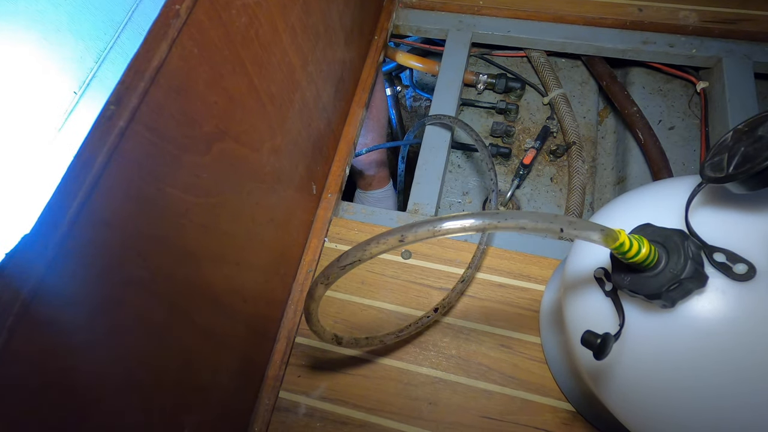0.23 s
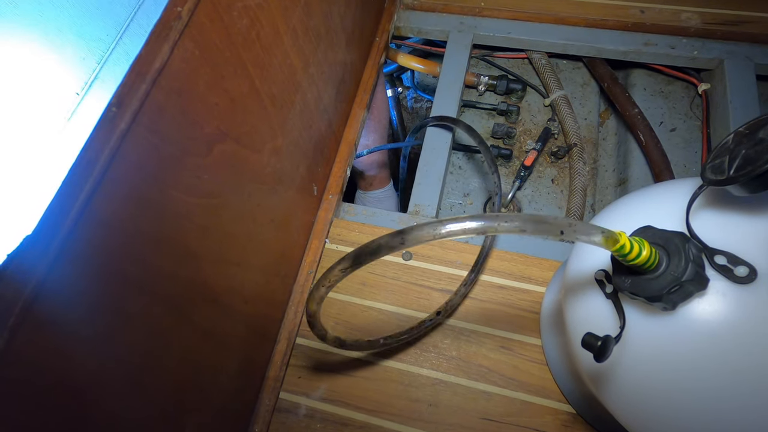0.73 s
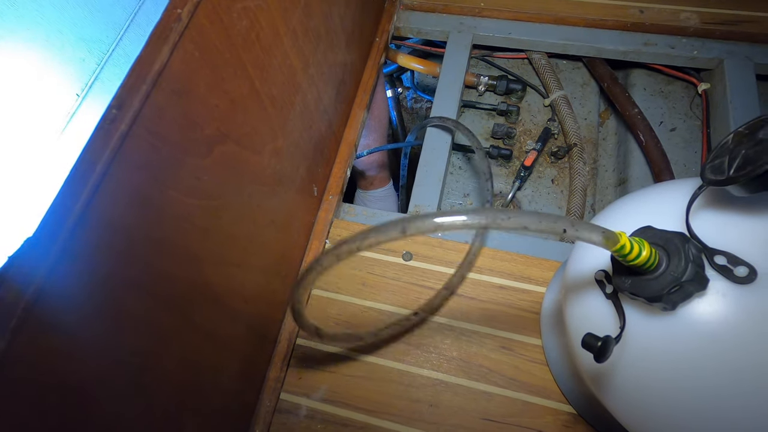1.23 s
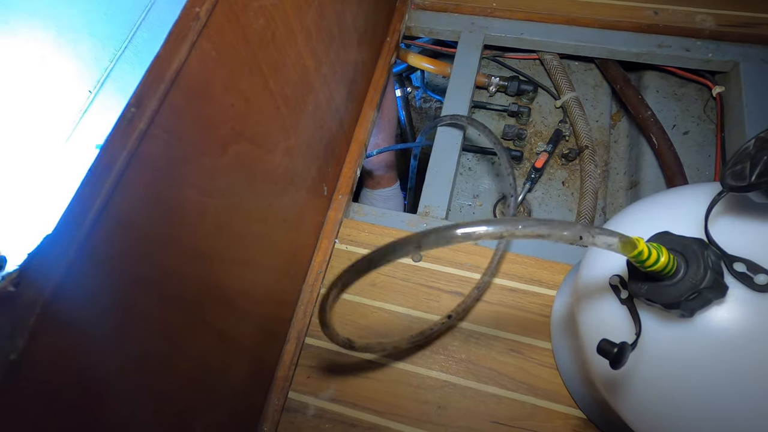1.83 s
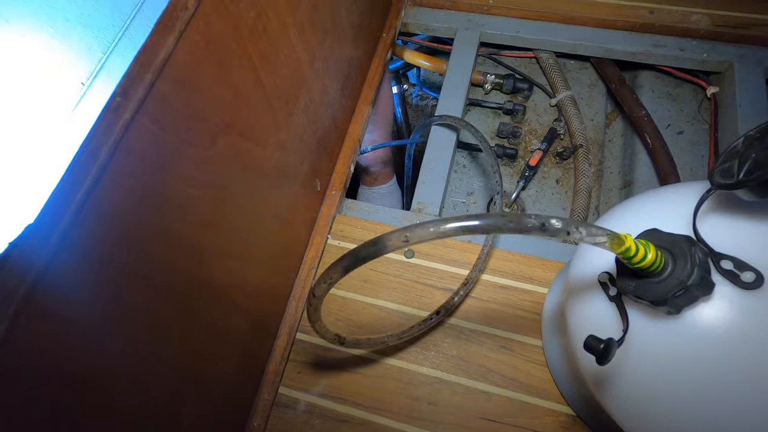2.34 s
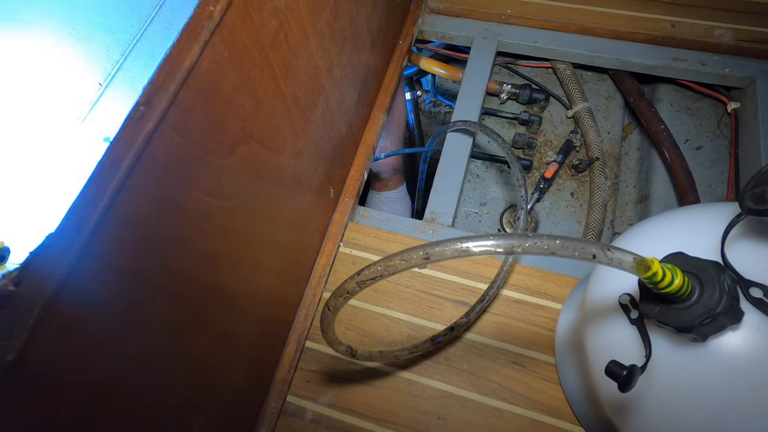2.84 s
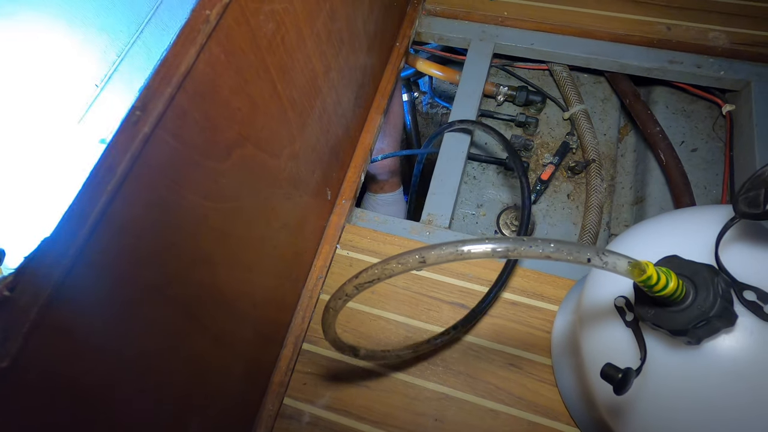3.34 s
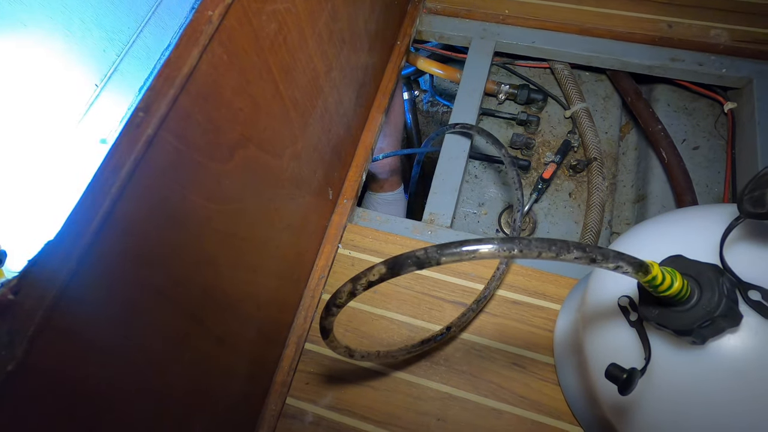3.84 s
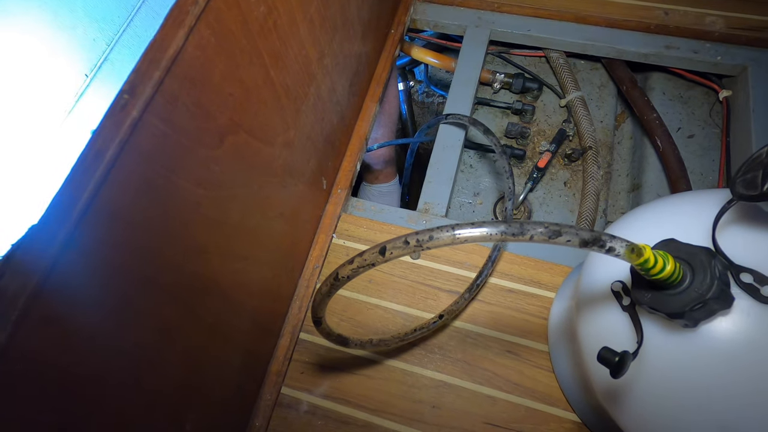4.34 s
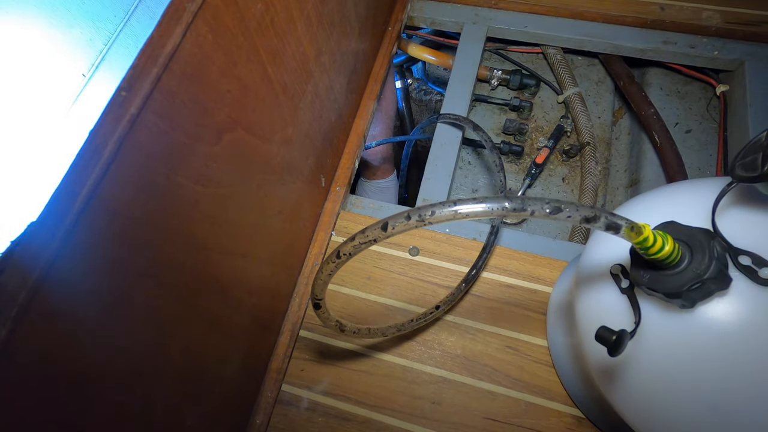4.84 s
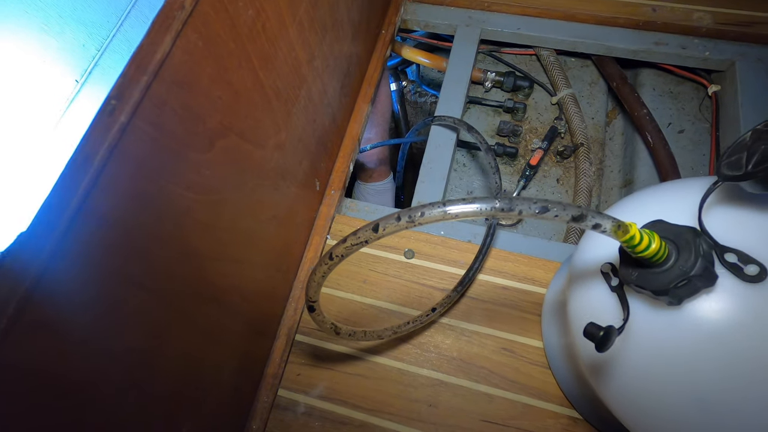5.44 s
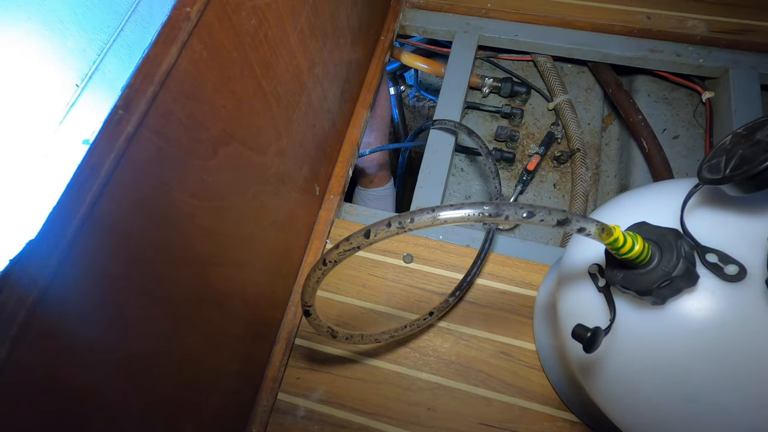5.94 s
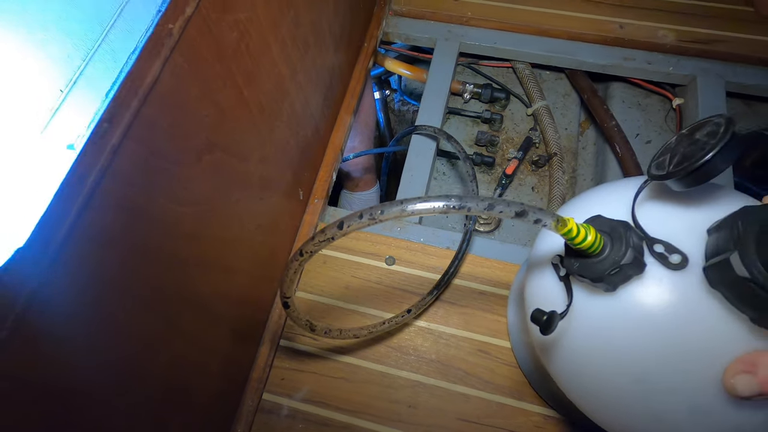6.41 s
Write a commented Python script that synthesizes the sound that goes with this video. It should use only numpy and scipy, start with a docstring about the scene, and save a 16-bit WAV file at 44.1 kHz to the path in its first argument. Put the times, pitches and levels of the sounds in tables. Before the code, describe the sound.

A close microphone in a small wooden boat bilge, with short boxy reflections and a faint low cabin hush. From 0 to 2.2 s a hose slurps air and oily liquid in dense, uneven gulps: hissy, spitting air with fizz, wet gurgles, bubbles sliding in pitch, tiny whistles and low hose shudders. From 2.2 to 3.3 s only a thin, hissing draught remains, with a sharp squeaky whistle at 2.6 s. Sputtering gulps return from 3.3 to 4.3 s, with hard knocks near 3.75 and 3.86 s and a soft floor slap. Suction dies by 4.6 s. Light rubs, creaks and dry ticks follow; a hollow plastic thump lands at 5.05 s. Pump strokes hiss at 5.2, 5.8 and 6.4 s, each about 0.15 s, stopped abruptly by a dull canister knock at 5.34, 5.97 and 6.55 s. Handling clunks fall between them, notably at 5.65 and 6.27 s.

```python
"""Gulps of air and oily water slurp up a hose from a boat's bilge, with fizz, gurgles and a few whistles;
the hose shudders and slaps the floor. Then a hand works the vacuum pump: in three strokes the piston
hisses down and knocks the plastic canister. Noise is coloured and sent through the hose's resonances for
the slurp, and through a seal's colour for the hiss; blows ring the canister as a set of fading tones."""
import sys
import numpy as np
from scipy import signal
from scipy.fft import rfft, irfft, next_fast_len
from scipy.io import wavfile
from scipy.ndimage import uniform_filter1d

SR = 44100
rng = np.random.default_rng(int(sys.argv[2]) if len(sys.argv) > 2 else 0)


def generate_wav(signal):
    """Clip the signal to [-1, 1] and save it as 16-bit WAV at the path in sys.argv[1]."""
    frames = np.transpose(np.atleast_2d(signal))
    scaled = np.clip(frames, -1, 1) * 32767
    pcm = np.round(scaled).astype(np.int16)
    wavfile.write(sys.argv[1], SR, pcm)


N = 294147  # samples
T = np.arange(N) / SR


def amp(db):
    """Turns dB into a factor on the sound wave."""
    return 10 ** (np.asarray(db) / 20)


def evened(x):
    """Scales x to an average (RMS) strength of 1."""
    return x / np.sqrt(np.mean(x ** 2) + 1e-20)


def read(points, hz):
    """Reads a curve between its points, along a log pitch scale."""
    f, value = np.transpose(points)
    return np.interp(np.log(hz + 1), np.log(f + 1), value)


def add(mix, s, sound):
    """Adds a sound into the mix from second s, cut off at the end of the mix."""
    part = mix[round(s * SR):][:len(sound)]
    part += sound[:len(part)]


def coloured(x, spectrum):
    """Filters x by a spectrum and evens it, so only the shape of the spectrum counts."""
    size = next_fast_len(len(x))
    gain = amp(read(spectrum, np.fft.rfftfreq(size, 1 / SR)))
    return evened(irfft(rfft(x, size) * gain, size)[:len(x)])


def resonate(x, hz, width):
    """A resonance of gain 1: shifts hz down to zero, smooths, and shifts back."""
    turn = np.exp(2j * np.pi * np.cumsum(hz * np.ones(len(x))) / SR)
    r = np.exp(-np.pi * width / SR)
    smooth = signal.lfilter([1 - r], [1, -r], x / turn + 1e-18)
    return 2 * (turn * smooth).real


def sputter(flicker_db, patchy_db):
    """White noise that flickers as droplets tear and drifts in patches of colour."""
    _, _, z = signal.stft(rng.standard_normal(N), nperseg=256, noverlap=192)
    patches = uniform_filter1d(rng.standard_normal(z.shape), size=5, axis=0)
    patches = uniform_filter1d(patches, size=20, axis=1)
    flicker = uniform_filter1d(rng.standard_normal(z.shape[1]), size=3)
    z = z * amp(patchy_db * evened(patches) + flicker_db * evened(flicker))
    return evened(signal.istft(z, nperseg=256, noverlap=192)[1][:N])


def curves(table):
    """Every column of a table after the time, drawn out to one value a sample."""
    s, *rest = np.transpose(table)
    return np.array([np.interp(T, s, c) for c in rest])


def burst(start, rise, hold, drift_db, fall_db_per_s):
    """Power of one burst: a smooth rise, a drifting hold, a steady fall in dB."""
    t = T[round(start * SR):][:SR // 2] - start
    held = np.clip((t - rise) / max(hold, .001), 0, 1)
    db = drift_db * held - fall_db_per_s * np.maximum(t - rise - hold, 0)
    swell = np.sin(np.pi / 2 * np.clip(t / max(rise, .001), 0, 1)) ** 2
    return (swell * amp(db)) ** 2


# resonances of the air column in the hose: [f/Hz, width/Hz, level/dB]
HOSE_MODES = [(1617, 55, -11), (2033, 38, -6), (2266, 78, 1), (2750, 14, -24.5), (3360, 36, -4),
              (3830, 95, -11), (4320, 99, -12), (4572, 22, -2), (6023, 28, -1), (6420, 320, -15.5),
              (7760, 16, -10), (8600, 33, -8), (9200, 370, 0.5), (9140, 44, -2.5), (9540, 28, 9),
              (9300, 38, -25), (10300, 40, -11), (10700, 66, -10.5)]
# colour of the air rush, of the hiss above it and of the spray fizz: [f/Hz, level/dB], shape only
RUSH_COLOUR = [(500, -36.5), (800, -2.5), (1300, -0.5), (1700, 1.5), (2300, 1.5), (2800, 3), (3400, -55.5)]
UPPER_COLOUR = [(2400, -16), (2950, 0), (3800, 3), (4700, -0.5), (5200, -5.5), (6000, -43.5)]
FIZZ_COLOUR = [(2940, -23), (5000, 1.5), (5600, 4.5), (6870, 4), (8300, 0), (8960, -4), (9440, -2),
               (10900, 0.5), (13600, -14), (15500, -44)]


def slurp():
    """Air tears through the hose modes, spray fizzes, bubbles gurgle and the hose shudders on the floor."""
    rush, hiss, spray, gurgle, shake = flow()
    air = coloured(sputter(1.4, 2.2), RUSH_COLOUR)
    upper = coloured(sputter(1.4, 2.2), UPPER_COLOUR)
    fizz = coloured(sputter(1.4, 2.2), FIZZ_COLOUR)
    jet = rush * air + hiss * upper + spray * fizz
    piped = 0.64 * jet + sum(amp(db) * resonate(jet, f, w) for f, w, db in HOSE_MODES)
    wash = coloured(sputter(2.2, 1.9), [(120, -39), (230, 18), (800, 16.5), (1100, -22.5)])
    shudder = coloured(rng.standard_normal(N),
                       [(30, -32.0), (70, 4.5), (100, 4), (140, 10.5), (200, 8.5), (260, -49.0)])
    wet = gurgle * (wash + amp(BUBBLE_DB) * bubbles()) + pocket()
    return (piped + wet + shake * shudder) * (T < DRAUGHT_POINTS[-1][0])


# air breaks in at the hose mouth: [t/s, rise/s, hold/s, drift over the hold/dB, air rush level/dB,
# upper hiss over the rush/dB, spray fizz over the rush/dB, gurgle level/dB, hose shudder level/dB]
GULP_EVENTS = [(0.0, 0.0018, 0.03, -8.5, -35, -1, -6.5, -44, -50),
               (0.028, 0.022, 0.1, 0, -40, -9, -12, -41.5, -48),
               (0.135, 0.018, 0.022, -3, -41.5, 2.5, -2.5, -46.5, -61.5),
               (0.192, 0.0062, 0.13, -10, -32, 2, -1.5, -40, -53),
               (0.341, 0.014, 0.021, -1, -41, -3.5, -3.5, -55, -62),
               (0.382, .025, 0.01, -4, -36, -2, -1.5, -36.5, -45.5),
               (0.497, 0.0063, 0.013, -4.5, -47, 7.5, 4, -48.5, -56),
               (0.543, 0.034, 0.051, 2.5, -40, 4, -1, -53.5, -72),
               (0.658, .015, 0.11, 3.5, -56.5, 5.5, 5, -78, -72),
               (0.754, 0.016, 0.016, -7.5, -46, 5, 1.5, -52, -76),
               (0.792, 0.036, 0.043, 1, -50, 4.5, -1, -68, -81),
               (0.834, 0.052, 0.027, 1.5, -36, -2, 0, -54.5, -85),
               (0.923, 0.015, 0.076, 4, -39, -1, -2, -52, -82),
               (1.008, 0.021, 0.08, -3, -33, -1, -1.5, -38, -54),
               (1.134, 0.0093, 0.032, -4, -31.5, -2, -5.5, -38.5, -48),
               (1.186, 0.014, 0.062, -2, -36, -6, -10.5, -43, -49),
               (1.262, .008, 0.056, 1, -32.5, -7.5, -12, -45.5, -47.5),
               (1.31, 0.026, 0.034, 2.5, -35, -0.5, -6, -43, -48),
               (1.386, 0.012, 0.078, -6, -36.5, 4, -2, -45.5, -56.5),
               (1.439, 0.093, 0.16, -0.5, -35, -1.5, -0.5, -47.5, -79),
               (1.694, .025, 0.063, -1, -35, -1, 0, -50, -82), (1.8, .01, 0.11, -1.5, -58, 1, -1, -53, -64),
               (1.88, .004, 0.048, -10, -37.5, -4, -6, -44, -57),
               (1.924, .015, 0.063, -2, -49.5, -1, 0.5, -60, -71),
               (1.977, 0.0046, 0.11, -5, -43.5, -1, -4, -54.5, -61),
               (2.07, 0.026, 0.011, -8.5, -40.5, -2.5, -2, -54, -67),
               (2.115, .015, 0.028, -8, -55.5, 1, 5, -58, -75),
               (2.159, .006, 0.036, -14, -48.5, -8, -25, -53, -74),
               (2.29, .012, .012, -4, -54, -13, -27, -64, -75),
               (2.613, 0.0051, 0.047, -11, -53.5, 4, -14, -66, -82),
               (3.049, 0.022, 0.035, -4, -45.5, -18, -18, -58, -77),
               (3.343, 0.01, 0.017, -6, -40, -2, -4, -59, -67),
               (3.386, .018, 0.027, -1, -39.5, -3.5, -10.5, -54, -64),
               (3.51, .02, 0.012, -9, -54.5, 11, 9.5, -56, -63),
               (3.559, 0.023, .012, -8, -50, 5, 3, -58, -73),
               (3.629, 0.013, 0.017, 2, -39.5, -4.5, -9, -51, -62),
               (3.654, 0.014, 0.02, -7.5, -35.5, 6, -8, -42, -46),
               (3.677, .01, .03, -2.5, -33, -11, -19, -34, -58),
               (3.724, .008, 0.022, -3, -31, -7, -18, -41.5, -42),
               (3.757, .01, 0.029, -6.5, -40, -5, -5, -41.5, -36.5),
               (3.869, 0.012, 0.023, -8.5, -43, -14, -19, -43.5, -54),
               (3.917, 0.044, 0.025, -2.5, -55, 4, 2.5, -74, -69),
               (4.008, 0.0063, 0.018, -12, -47, 1.5, -1.5, -71, -75),
               (4.154, 0.021, 0.018, -4.5, -33.5, -5, -12, -55, -70),
               (4.185, 0.0093, 0.011, -6, -41, 9.5, 6.5, -48, -58),
               (4.248, 0.022, 0.027, -1, -55.5, -5, -11, -78, -60)]
# the thin draught between gulps: [t/s, air rush level/dB, upper hiss over the rush/dB,
# fizz over the rush/dB, gurgle level/dB, shudder level/dB]
DRAUGHT_POINTS = [(0, -71, 3, 2, -58, -69), (2.1, -76, 3, 2, -85, -85), (2.22, -60.5, -1.5, -14, -66, -69),
                  (2.6, -66.5, 2, -14, -67.5, -79), (2.7, -61.5, -1, -8, -67, -73),
                  (2.75, -63, 3, 7, -65, -86), (2.81, -67.5, 0, 3, -75, -76),
                  (2.84, -60.5, 5.5, 4, -97, -71), (2.98, -56.5, 7, 2, -70, -86),
                  (3.13, -52.5, 5.5, -0.5, -57.5, -80), (3.33, -49.5, 0.5, -2.5, -55.5, -70),
                  (3.49, -52, 1, -5.5, -55.5, -73), (3.62, -57.5, -1, 2, -62, -76),
                  (3.85, -59.5, 1.5, -10, -65, -69), (4.13, -61.5, 3.5, -11.5, -66.5, -67),
                  (4.36, -56, 0, -18, -66.5, -63), (4.46, -83, 0, -12, -79, -77),
                  (4.6, -89, -6.5, -9, -82, -62)]
# how fast each layer dies after a gulp: [rush, upper hiss, fizz, gurgle, shudder], all in dB/s
GULP_FALL = (420, 430, 450, 450, 300)


def flow():
    """Gains of rush, upper hiss, fizz, gurgle and shudder: the powers of draught and gulps add up."""
    rush, upper, fizz, gurgle, shudder = curves(DRAUGHT_POINTS)
    power = amp([rush, rush + upper, rush + fizz, gurgle, shudder]) ** 2
    for s, rise, hold, drift_db, rush, upper, fizz, gurgle, shudder in GULP_EVENTS:
        levels = (rush, rush + upper, rush + fizz, gurgle, shudder)
        for layer, db, fall in zip(power, levels, GULP_FALL):
            add(layer, s, amp(db) ** 2 * burst(s, rise, hold, drift_db, fall))
    return np.sqrt(power)


# the air pocket at the hose mouth glides as oil fills or clears it:
# [t/s, length/s, from f/Hz, to f/Hz, level/dB]
POCKET_GLIDES = [(0.044, .04, 344, 318, -43), (.11, 0.11, 330, 340, -44.5), (.25, 0.02, 540, 750, -42),
                 (.29, 0.0293, 710, 1170, -43), (0.366, 0.064, 460, 288, -40.5), (.57, 0.04, 585, 616, -51),
                 (0.644, 0.11, 696, 674, -60), (0.849, 0.056, 530, 483, -40.5),
                 (0.918, 0.13, 466, 406, -42), (1.009, 0.066, 550, 644, -37.5),
                 (1.059, 0.047, 397, 426, -39), (1.103, 0.061, 334, 292, -42.5),
                 (1.139, 0.022, 480, 584, -41), (1.236, 0.17, 287, 343, -43.5),
                 (1.513, 0.12, 685, 630, -44.5), (1.54, 0.07, 403, 374, -39.5), (1.623, 0.1, 487, 540, -41),
                 (1.686, 0.11, 540, 560, -37.5), (1.881, 0.052, 570, 504, -44),
                 (2.144, 0.024, 560, 666, -51), (2.924, 0.079, 215, 237, -65),
                 (3.137, 0.054, 287, 300, -63), (3.22, 0.095, 460, 740, -57.5),
                 (3.68, 0.022, 286, 259, -31.5), (3.76, 0.054, 325, 297, -42.5)]
GLIDE_EDGE_S = 0.011  # fade at either end


def pocket():
    """Bubbles burst over the draught and ring the gliding air pocket."""
    out, t = np.zeros(N), np.arange(12000) / SR
    for s, length, from_hz, to_hz, db in POCKET_GLIDES:
        # a soft draught with about 900 stronger pops a second
        pops = rng.standard_normal(len(t)) * (0.25 + (rng.random(len(t)) < 900 / SR))
        hz = from_hz + (to_hz - from_hz) * np.minimum(t / length, 1)
        edge = np.clip(np.minimum(t, length + GLIDE_EDGE_S - t) / GLIDE_EDGE_S, 0, 1)
        tone = evened(resonate(resonate(pops, hz, 65.), hz, 110.))
        add(out, s, amp(db) * edge * tone)
    return out


BUBBLE_LOW_HZ, BUBBLE_HIGH_HZ, BUBBLES_PER_S = 282, 2330, 320
BUBBLE_CYCLES = 5  # cycles that set the length of a blip
BUBBLE_RISE = 0.18  # share of its pitch that a bubble climbs in that length
BUBBLE_DB = -4.5  # level over the gurgle


def bubbles():
    """Scattered bubbles of all sizes, each a short dying tone that rises as it breaks the surface."""
    out, t = np.zeros(N), np.arange(1500) / SR
    for hz in np.geomspace(BUBBLE_LOW_HZ, BUBBLE_HIGH_HZ, num=16):
        strength = amp(4. * np.minimum(rng.exponential(1, N), 4))
        hits = strength * (rng.random(N) < BUBBLES_PER_S / 16 / SR)
        u = t * hz / BUBBLE_CYCLES
        blip = u * np.exp(-2 * u) * np.sin(2 * np.pi * np.cumsum(hz * (1 + BUBBLE_RISE * u)) / SR)
        # small, high bubbles are weaker
        blip = blip / np.linalg.norm(blip) * (BUBBLE_LOW_HZ / hz) ** 0.24
        out += signal.oaconvolve(hits, blip)[:N]
    return evened(out)


# a film of oil makes the hose end whistle: [t/s, level before the mix/dB, f/Hz, length/s]
WHISTLE_EVENTS = [(1.097, -56, 2360, 0.022), (0.064, -34.5, 1760, 0.0069), (0.195, -32, 2200, 0.025),
                  (1.255, -29, 2280, 0.017), (1.305, -33, 3030, 0.01), (1.41, -35, 2320, 0.011),
                  (2.164, -52.5, 1184, 0.055), (2.165, -52, 1870, 0.057), (2.178, -37.5, 2270, 0.013),
                  (2.195, -48, 2305, 0.02), (2.622, -57, 3840, 0.023), (2.624, -23.5, 3185, 0.015),
                  (2.638, -27, 3167, 0.012), (2.615, -40, 3300, .008), (2.654, -48, 3200, .025),
                  (2.63, -49, 10400, 0.025), (2.634, -50, 11200, .015), (2.714, -47.5, 9700, 0.017),
                  (2.691, -60, 3150, 0.028), (2.774, -54, 4470, .025), (2.957, -47, 2300, 0.029),
                  (3.068, -52, 1500, 0.022), (3.48, -35.5, 2285, 0.0064), (3.663, -34, 6100, 0.037),
                  (3.733, -19.5, 2300, 0.0063), (4.016, -49, 6400, 0.035), (4.018, -43.5, 6800, 0.016),
                  (4.334, -37.5, 1630, 0.0028)]
WHISTLE_RISE, WHISTLE_RISE_S = 0.029, 0.013  # a whistle climbs by this share of its pitch as it starts


def whistles():
    """Short wavering tones, airy at high pitch, with a quick swell and a ringing end."""
    out, t = np.zeros(N), np.arange(6000) / SR
    for s, db, hz, length in WHISTLE_EVENTS:
        waver = evened(uniform_filter1d(rng.standard_normal((2, len(t))), size=150, axis=1))
        climb = WHISTLE_RISE * np.minimum(t / WHISTLE_RISE_S, 1)
        pitch = hz * (1 + 0.01 * waver[1] + climb)
        tone = amp(1.8 * waver[0]) * np.sin(2 * np.pi * np.cumsum(pitch) / SR)
        air = resonate(rng.standard_normal(len(t)), hz, 0.17 * hz)
        air = evened(resonate(air, hz, 0.35 * hz))
        airy = np.clip(hz / 6400.0, 0, 1) ** 1.23  # share of noisy air
        shape = np.minimum(t / 0.0031, 1) * np.exp(-np.maximum(t - length, 0) / 0.0031)
        add(out, s, amp(db) * shape * ((1 - airy) * tone + 0.43 * airy * air))
    return out


# the piston going down: [t/s, stop t/s, seal hiss level/dB, swell over the stroke/dB]
PISTON_STROKES = [(5.189, 5.336, -34.5, 3), (5.815, 5.964, -36.5, 0), (6.422, 6.547, -34.5, 0.5)]
# colour of the seal's hiss: [f/Hz, level/dB], shape only
SEAL_COLOUR = [(180, -7), (300, -45), (517, -4), (708, 4), (782, -2.5), (2480, 3), (3080, 6.5), (3750, 6.5),
               (4810, 7), (5400, 2), (9780, 0.5), (13000, -11), (15500, -54)]
# a hand slides on the pump: [t/s, length/s, hiss level/dB]
HAND_RUBS = [(4.74, 0.04, -59), (4.825, 0.01, -53.5), (4.87, 0.021, -57.5), (5.024, 0.015, -61),
             (5.428, 0.016, -67), (5.635, 0.0084, -61), (5.705, .008, -74), (6.065, 0.02, -62.5),
             (6.26, 0.0092, -66.5)]
# hands at rest on the pump: [t/s, hiss level/dB, creak level/dB]
GRIP_POINTS = [(4.6, -84, -62.5), (4.75, -53.5, -55), (4.9, -62.5, -61), (5.03, -65, -58), (5.1, -71, -58),
               (5.6, -71, -61), (5.7, -75.5, -62), (6.25, -70.5, -70), (6.33, -80, -61), (6.55, -71, -66),
               (6.67, -68.5, -47)]
PUSH_S, STOP_DB_PER_S = 0.026, 2200  # the hand gets up to speed; the hiss is cut at the stop
STROKE_CREAK_DB = -18  # creak over the hiss
# a faint hiss grows as the hand loads the handle: lead time, level over the stroke, steepness
TAKE_UP_S, TAKE_UP_DB, TAKE_UP_DB_PER_S = 0.062, -24, 172
RUB_RISE_S, RUB_DB_PER_S = 0.0051, 503
AFTER_DB, AFTER_DB_PER_S = -29, 110  # the canister rocks and creaks on after a blow: level over its boom, fall


def pump():
    """The seal hisses with the piston's speed; the handled canister creaks in its own modes."""
    hiss, creak = amp(curves(GRIP_POINTS)) ** 2  # powers
    for s, stop, db, swell_db in PISTON_STROKES:
        stroke = amp(db) ** 2 * burst(s, 0, stop - s, swell_db, STOP_DB_PER_S)
        speed = 1 - np.exp(-(T[:len(stroke)] / PUSH_S) ** 1.6)
        stroke = stroke * speed ** 2
        add(hiss, s, stroke)
        add(creak, s, amp(STROKE_CREAK_DB) ** 2 * stroke)
        # grows until the stroke starts, then fades
        from_start = abs(np.arange(TAKE_UP_S, -TAKE_UP_S / 2, -1 / SR))
        add(hiss, s - TAKE_UP_S, amp(db + TAKE_UP_DB - TAKE_UP_DB_PER_S * from_start) ** 2)
    for s, length, db in HAND_RUBS:
        add(hiss, s, amp(db) ** 2 * burst(s, RUB_RISE_S, length, 0, RUB_DB_PER_S))
    for s, _, boom_db, *_ in KNOCK_EVENTS:
        add(creak, s, amp(boom_db + AFTER_DB) ** 2 * burst(s, .02, 0, 0, AFTER_DB_PER_S))
    seal = np.sqrt(hiss) * coloured(sputter(1.2, 1.5), SEAL_COLOUR)
    creaking = np.sqrt(creak) * evened(ring(rng.standard_normal(N))[:N])
    return (seal + creaking) * (T > GRIP_POINTS[0][0])


# blows on canister and floor: [t/s, crack level/dB, boom level/dB, length of the blow/s,
# hardness (factor on the crack's pitch), ring of the crack (factor on its length), tick f/Hz]
KNOCK_EVENTS = [(3.665, -47, -41, 0.01, 0.7, 1.1, 1630), (3.689, -41, -32, 0.0069, 0.78, 1.4, 610),
                (3.753, -17, -24.5, 0.021, 1, 0.66, 1870), (3.808, -36.5, -47, 0.01, 0.93, 1.9, 1400),
                (3.86, -18.5, -36, 0.012, 0.73, 1.63, 1486), (4.651, -72, -47.5, 0.0085, 0.88, 1.4, 1190),
                (4.747, -33, -36, 0.01, 0.61, 1.6, 690), (4.836, -44.5, -40, 0.046, 1, 7.2, 1390),
                (5.045, -22.5, -12.5, 0.013, 0.67, 1.8, 820), (5.073, -26.5, -16.5, 0.0045, 0.99, 2.4, 710),
                (5.082, -53, -19, 0.0097, 0.8, 1.6, 716), (5.305, -31, -27, 0.0046, 0.68, 0.92, 675),
                (5.339, -16, -13, 0.0083, 0.93, 1.7, 692), (5.444, -38, -29.5, 0.0099, 0.72, 1.7, 620),
                (5.652, -21.5, -13, 0.016, 0.7, 1.7, 820), (5.67, -29.5, -35, 0.016, 0.61, 2.3, 710),
                (5.71, -29.5, -26, 0.0079, 0.97, 2.2, 684), (5.718, -41, -19.5, 0.0084, 1, 6, 713),
                (5.967, -16, -14, 0.011, 1, 2.2, 704), (6.074, -45.5, -34, 0.011, 0.63, 2.5, 720),
                (6.15, -45.5, -32.5, 0.017, 0.92, 3, 670), (6.262, -45, -29, 0.012, 0.56, 2.1, 1080),
                (6.271, -23.5, -18, 0.01, 0.68, 1.5, 820), (6.31, -40.5, -23, 0.0054, 0.86, 2.8, 704),
                (6.32, -47, -31, 0.0082, 0.8, 1.4, 711), (6.549, -17, -12, 0.0046, 1, 2.2, 1185),
                (6.665, -38.5, -38, 0.012, 0.63, 1.4, 607)]
# colour of the crack before the hardness shifts it: [f/Hz, level/dB], shape only
CRACK_COLOUR = [(250, -17), (600, -3), (1200, 6), (1800, 4), (2800, 3), (4500, -12.5), (7000, -25.5),
                (12000, -51)]
# time for the crack to fall by 60 dB, before the ring factor: [f/Hz, time/s]
CRACK_FADE = [(600, 0.18), (1500, 0.047), (3000, 0.024), (8000, 0.052)]
LIGHT_DB, LIGHT_THIN = -10.5, 0.22  # lighter blows lose bass: dB an octave under THIN_HZ for each dB


def knocks():
    """A falling tick with a short rattle, over a rough push that sets the canister booming."""
    out, t = np.zeros(N), np.arange(8192) / SR
    for s, crack_db, boom_db, length, hard, ringing, tick_hz in KNOCK_EVENTS:
        hz, frames, z = signal.stft(rng.standard_normal(len(t)), SR, nperseg=128)
        fall_db = 60 * frames / (ringing * read(CRACK_FADE, hz)[:, None])
        colour_db = read(CRACK_COLOUR, hz / hard)[:, None]
        rattle = signal.istft(z * amp(colour_db - fall_db), SR)[1][:len(t)]
        rattle = rattle / np.sqrt(np.mean(rattle[:200] ** 2))
        # bending waves bring the treble first: the tick drops in pitch
        tick_pitch = tick_hz * (.8 + .6 * np.exp(-t / .0015))
        tick = np.exp(-t / .0028) * np.sin(2 * np.pi * np.cumsum(tick_pitch) / SR)
        crack = 1.5 * tick + (0.19 + 0.59 * np.exp(-t / 0.0017)) * rattle
        onset = np.sin(np.pi / 2 * np.minimum(t / 0.0015, 1)) ** 2
        add(out, s, amp(crack_db) * crack * onset)
        push = rng.standard_normal(4096) * np.exp(-t[:4096] / max(length, .001))
        thin_db = LIGHT_THIN * max(LIGHT_DB - boom_db, 0)
        boom = ring(push / np.linalg.norm(push), loose_db=1.0, detune=0.025, thin_db=thin_db)
        add(out, s, amp(boom_db) * boom)
    return out


# what a blow rings in the canister, before chance shifts it: [f/Hz, level/dB, time to fall by 60 dB/s]
CANISTER_MODES = [(73.5, -30, 0.67), (114, -54, .25), (141, 1, 0.13), (207, -2, 0.13), (264.3, -1.5, 0.069),
                  (228.1, -8, 0.24), (283.3, -6, 0.14), (309, 0, .15), (349.4, 8, 0.059), (393, 2.5, 0.072),
                  (464.6, -2.5, 0.079), (530.5, 0.5, 0.04), (650, 1, 0.015)]
THIN_HZ = 330


def ring(x, loose_db=0., detune=0., thin_db=0.):
    """The canister's modes answer a push; chance shifts their balance, and the low ones swell slowly."""
    t, chance = np.arange(14000) / SR, rng.standard_normal((len(CANISTER_MODES), 2))
    modes = np.zeros(len(t))
    for (hz, db, t60), (a, b) in zip(CANISTER_MODES, chance):
        thinned = thin_db * max(np.log2(THIN_HZ / hz), 0)
        fading = amp(db + loose_db * a - thinned - 60 * t / t60)
        swell = 1 - np.exp(-t * hz / 0.77)
        modes += fading * swell * np.sin(2 * np.pi * hz * (1 + detune * b) * t)
    boom = signal.oaconvolve(x, modes)
    # same energy as the modes alone would have with a peak of 1
    return boom * np.linalg.norm(modes) / np.linalg.norm(boom) / np.abs(modes).max()


# the hose drops on a floorboard: [t/s, level/dB]
HOSE_SLAPS = [(.39, -57), (1.02, -55), (1.27, -53), (1.88, -58.5), (3.66, -55), (3.754, -42)]
BOARD_HZ, BOARD_T60, BOARD_RISE_S = 74, 0.67, .012  # pitch, seconds to fall by 60 dB, swell


def slaps():
    """A deep short hum of the floorboard."""
    out, t = np.zeros(N), np.arange(SR // 2) / SR
    swell = 1 - np.exp(-t / BOARD_RISE_S)
    hum = amp(-60 * t / BOARD_T60) * swell * np.sin(2 * np.pi * BOARD_HZ * t)
    for s, db in HOSE_SLAPS:
        add(out, s, amp(db) * hum)
    return out


# faint dry ticks: [t/s, level/dB]
DRIP_TICKS = [(4.636, -66), (4.6518, -58), (4.678, -52), (4.902, -54), (4.9598, -50), (4.9964, -54),
              (5.164, -49), (5.453, -57), (5.481, -57), (5.5036, -55), (5.5174, -61), (5.5646, -61),
              (5.61, -60), (6.072, -60), (6.0874, -55), (6.1024, -56), (6.4126, -55)]


def drips():
    """Tiny dry ticks, perhaps drops of oil, while the pump is handled: quickly fading noise."""
    out, t = np.zeros(N), np.arange(600) / SR
    for s, db in DRIP_TICKS:
        tick = coloured(rng.standard_normal(600), [(1500, -9), (2500, 2), (6000, -7), (12000, -38)])
        add(out, s, amp(db) * tick * np.exp(-t / 0.0036))
    return out


BILGE_DB, BILGE_T60 = -5, 0.11  # echoes of the cramped bilge: level, seconds to fall by 60 dB


def bilge(x):
    """Sparse echoes of random sign between close wooden walls comb the sound."""
    at = np.arange(40, 8000, 22) + rng.integers(0, 22, 362)  # delays in samples
    taps = np.zeros(8100)
    taps[at] = rng.choice([-1., 1.], len(at)) * amp(-60 * at / SR / BILGE_T60)
    wet = amp(BILGE_DB)
    echoes = signal.oaconvolve(x, taps / np.linalg.norm(taps))[:N]
    return (x + wet * echoes) / np.sqrt(1 + wet ** 2)


# colour of the quiet cabin: [f/Hz, level/dB], shape only
CABIN_COLOUR = [(18, -60), (30, -45.5), (46, -34.5), (85, -26.5), (182, -9), (213, -0.5), (270, -7),
                (768, -16), (1080, -9), (2910, -17), (15500, -64.5)]
CABIN_DB = -65


def cabin():
    """The quiet cabin: soft, gently flickering noise, mostly low."""
    return amp(CABIN_DB) * coloured(sputter(0.79, 2), CABIN_COLOUR)


def scene():
    """Adds up all sources, alike on both channels; slurp and whistles echo in the bilge."""
    whistle = whistles()  # partly heard straight through the open hatch
    hose = bilge(slurp() + 0.89 * whistle) + 0.49 * whistle
    near = hose + pump() + knocks() + slaps() + drips()
    return np.tile(near + cabin(), (2, 1))


# how far the two channels differ: [f/Hz, level of the difference (side) over the common part (mid)/dB]
PORTS_APART = [(60, -44), (99, -28), (160, -75), (270, -53), (450, -67), (740, -49), (1220, -65),
               (2010, -68), (3330, -61), (5500, -70.5), (9080, -40.5), (15000, 15.5)]


def record(dry):
    """The microphone drops deep bass; its two ports differ mainly in the top treble; then a 15.5 kHz limit."""
    dry = signal.sosfilt(signal.butter(4, 48, "high", fs=SR, output="sos"), dry)
    hz, _, z = signal.stft(dry[0], SR, nperseg=256)
    # random phases make the side signal unlike the middle
    turned = z * amp(read(PORTS_APART, hz))[:, None] * np.exp(2j * np.pi * rng.random(z.shape))
    side = signal.istft(turned, SR)[1][:N]
    both = dry + side * np.array([[1], [-1]])
    band_limit = signal.firwin(511, 15500, window=("kaiser", 9), fs=SR)
    return signal.oaconvolve(both, band_limit[None], "same")


dry = scene()
out = record(dry)
generate_wav(out)
```